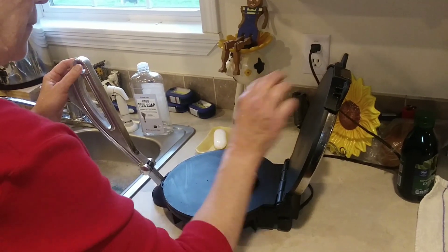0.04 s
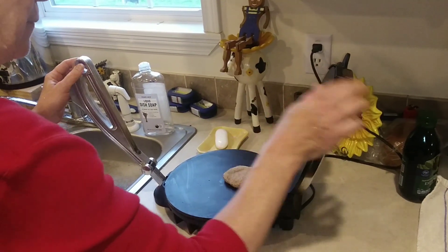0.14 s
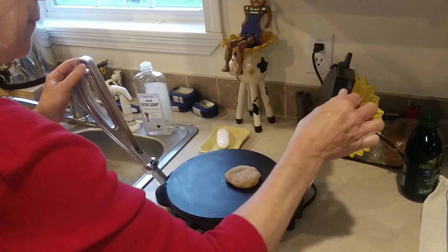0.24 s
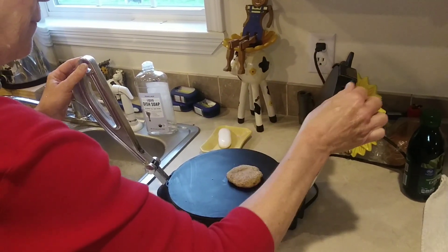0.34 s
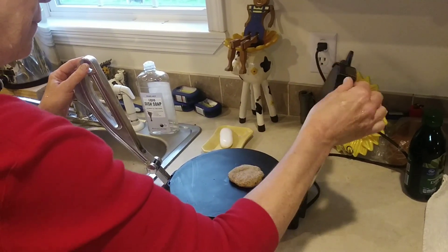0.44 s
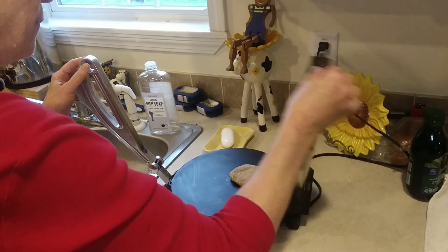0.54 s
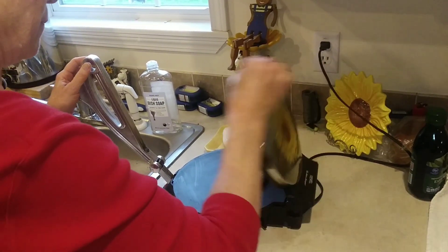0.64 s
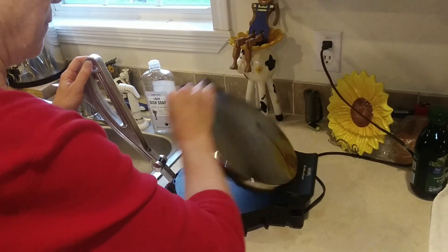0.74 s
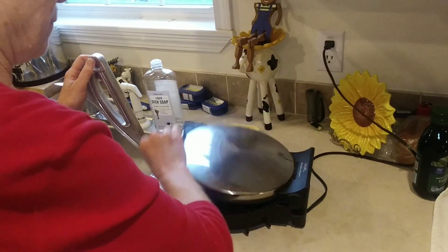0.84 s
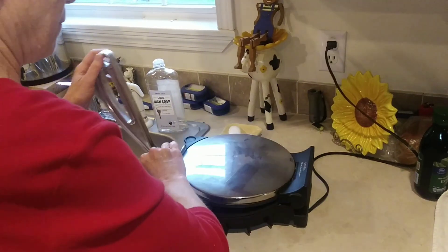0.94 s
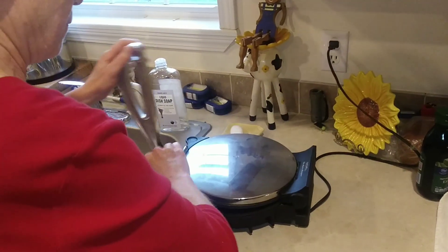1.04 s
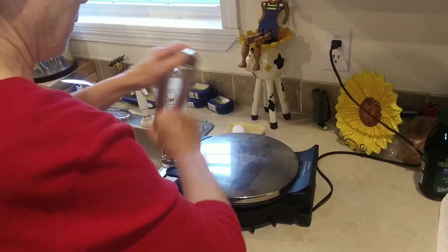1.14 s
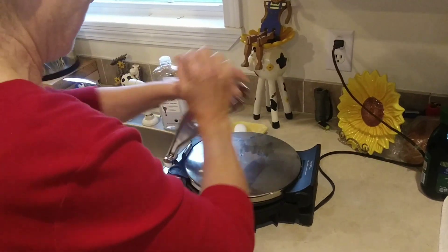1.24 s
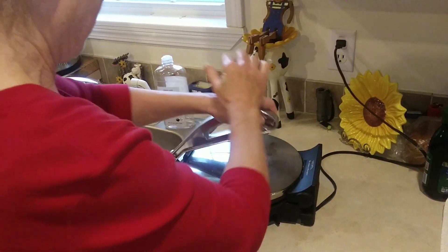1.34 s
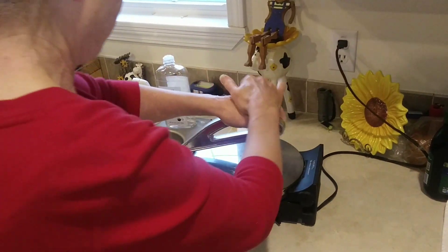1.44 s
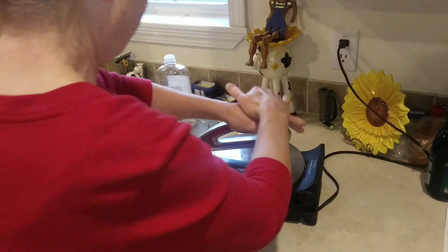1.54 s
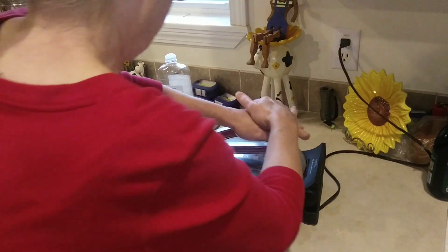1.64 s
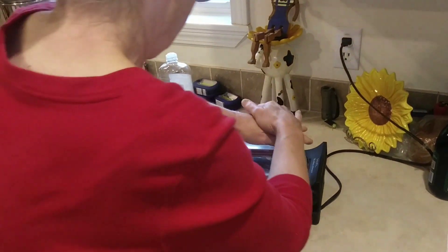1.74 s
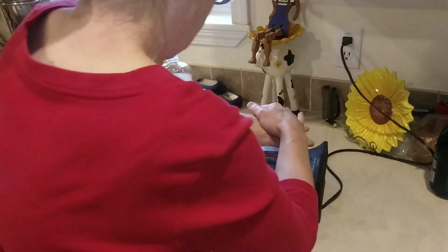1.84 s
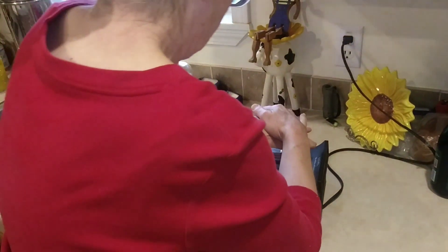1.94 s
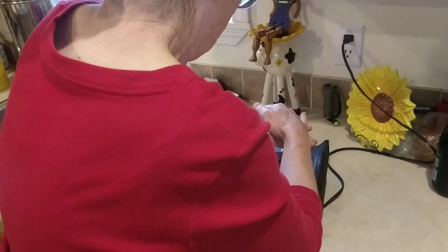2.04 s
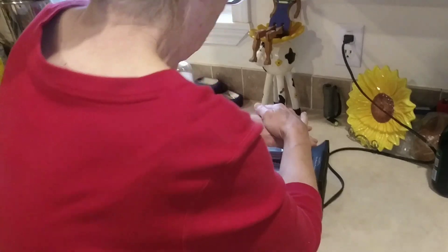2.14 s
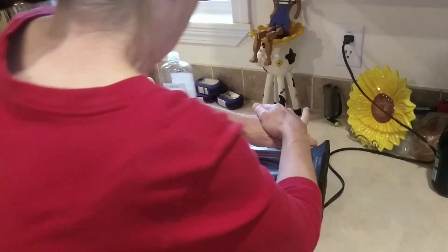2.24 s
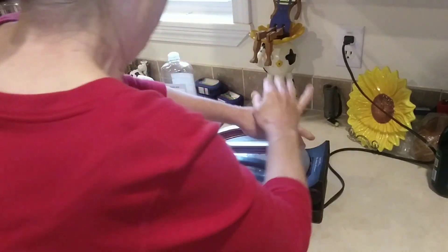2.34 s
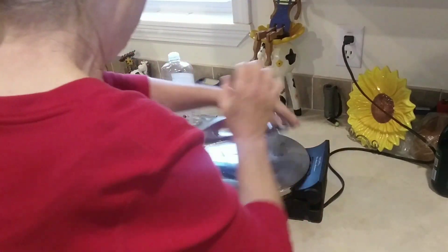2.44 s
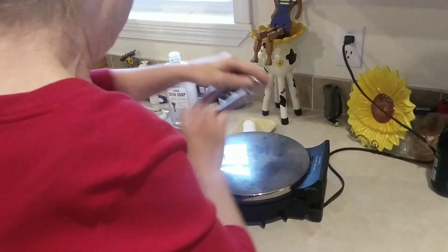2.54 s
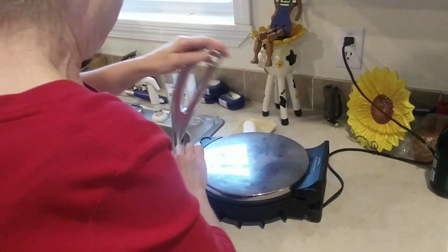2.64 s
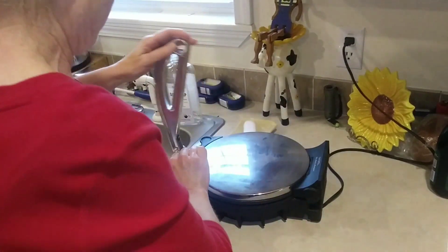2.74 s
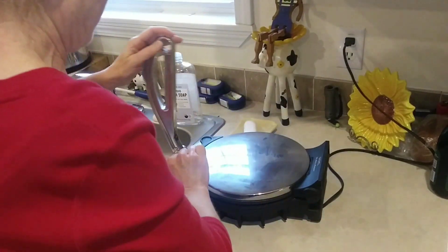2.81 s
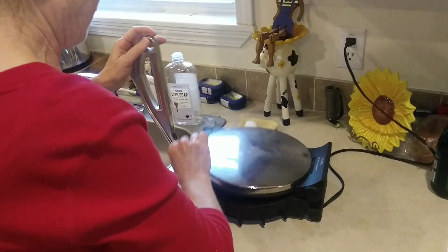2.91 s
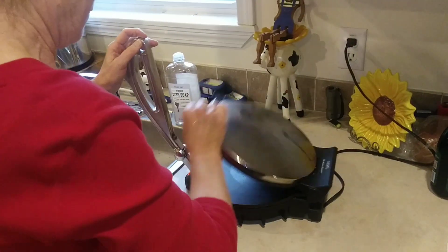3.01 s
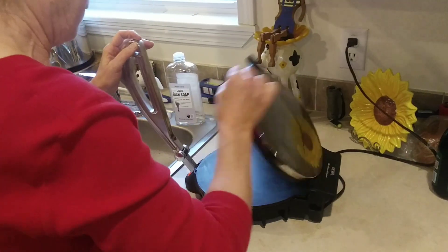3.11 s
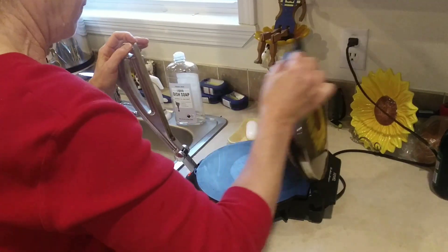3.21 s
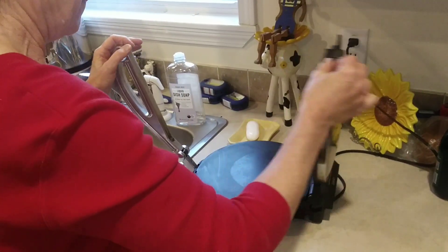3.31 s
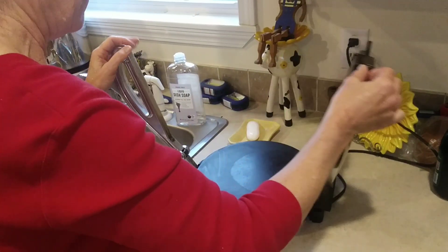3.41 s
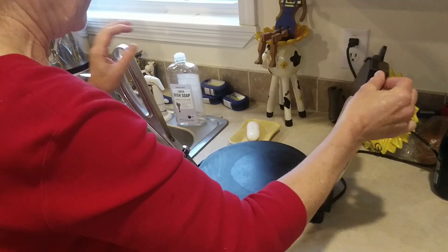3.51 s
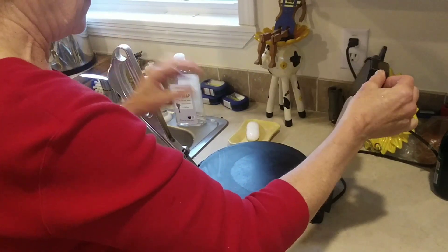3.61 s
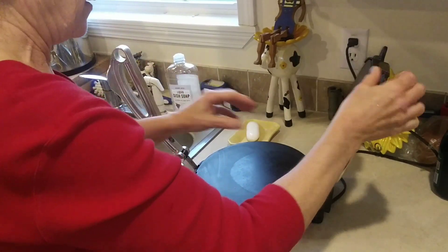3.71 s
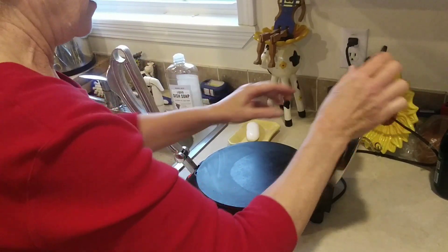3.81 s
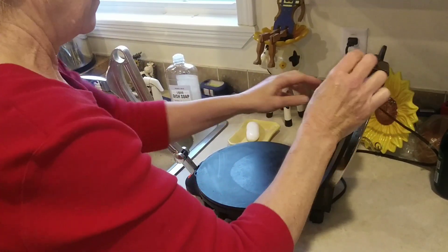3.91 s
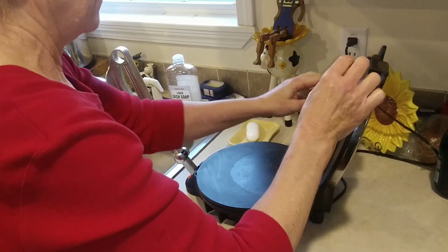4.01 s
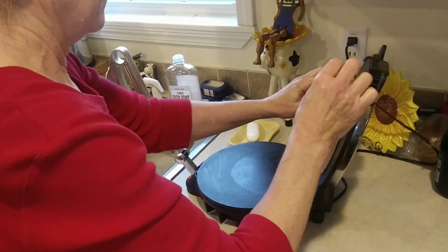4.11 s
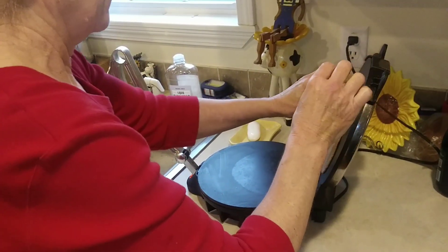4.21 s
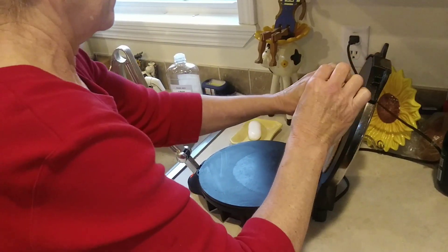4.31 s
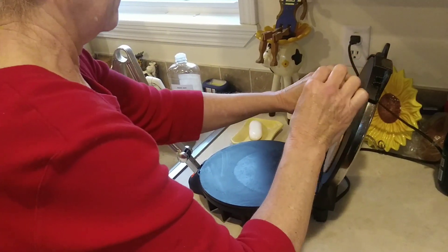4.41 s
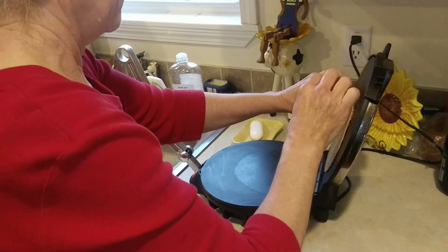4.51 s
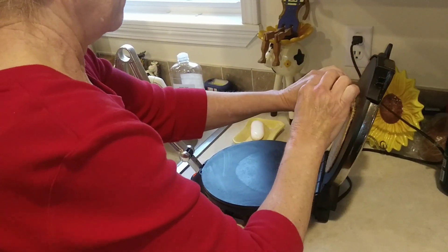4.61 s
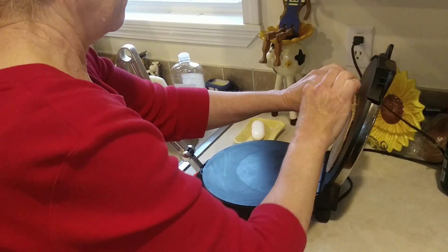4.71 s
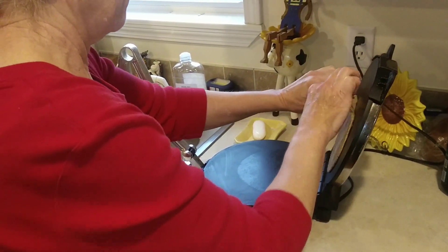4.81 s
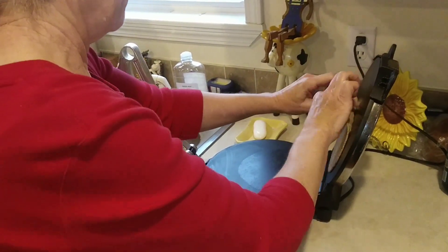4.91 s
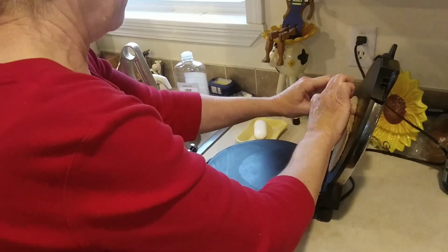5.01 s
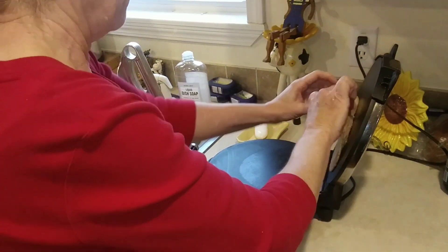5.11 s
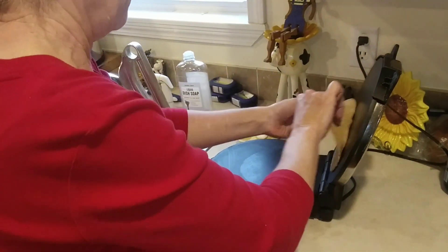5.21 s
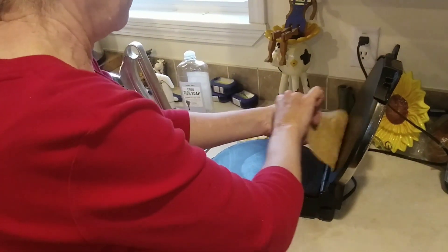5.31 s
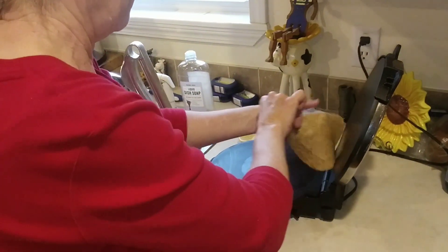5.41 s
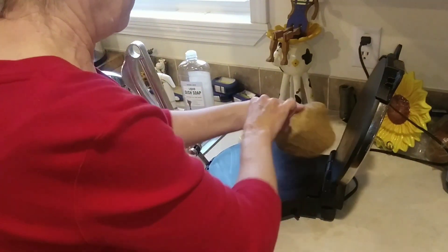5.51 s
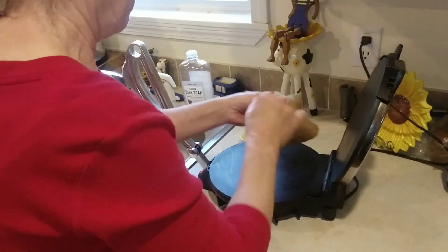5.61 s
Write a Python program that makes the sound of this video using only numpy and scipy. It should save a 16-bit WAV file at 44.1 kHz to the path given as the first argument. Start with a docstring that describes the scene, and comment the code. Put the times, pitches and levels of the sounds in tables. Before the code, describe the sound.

A near microphone with bright treble hears an electric flatbread press on a counter: one initial click, faint hand rubs, lid clattering shut, one hard lever bang with a short metal ring, a crisp snap and soft hiss. Unlatching brings scattered knocks, then the lid hits its stop. Near-quiet follows with tiny ticks and a delicate clink. Short room reflections and faint hiss remain throughout.

```python
"""Small hard kitchen, an electric tortilla press on the counter, near enough that direct sound outweighs the room.
The lid comes down on dough, the lever is swung over and leaned on, both are lifted, the tortilla is peeled off.
Dull knocks are noise bursts that ring the plates' modes; hinge and handle snap in sharp clicks; bumps, clear metal
notes and rattles surround them. Squeezed dough hisses and hands rub as grainy coloured noise.
The microphone has a bright port resonance and a faint floor of room tone and hiss."""
import sys
import numpy as np
from scipy import signal
from scipy.fft import rfft, irfft
from scipy.io import wavfile

SR = 44100
rng = np.random.default_rng(int(sys.argv[2]) if len(sys.argv) > 2 else 0)


def inscribe(sig):
    """Save sig as 16-bit PCM at rate SR to the path in sys.argv[1].

    A 1-D sig is mono; a 2-D sig holds one channel per row.
    Samples are clipped to [-1, 1] before scaling.
    """
    pcm = np.round(np.clip(np.atleast_2d(sig).T, -1, 1) * 32767)
    wavfile.write(sys.argv[1], SR, pcm.astype(np.int16))


N = 249279
BLOW_S, LONG_S = 0.015, 0.7   # span that sets a blow's level, longest ringing
CUTOFF_HZ = 15500   # top of the microphone's range


def from_db(db):
    """Decibels to gain."""
    return 10 ** (np.asarray(db) / 20)


def rms_one(x):
    """Scale to rms 1."""
    return x / np.sqrt(np.mean(x ** 2) + 1e-20)


def at_hz(points, hz):
    """Read a table on a log-frequency axis."""
    table_hz, value = np.transpose(points)
    return np.interp(np.log(np.maximum(hz, 1)), np.log(table_hz), value)


def add(out, start_s, sound):
    """Mix a sound in at a time."""
    start = max(int(start_s * SR), 0)
    out[start:start + len(sound)] += sound[:N - start]


def band(x, low_hz, high_hz, order=3):
    """Butterworth band-pass."""
    edges_hz = [low_hz, min(high_hz, 0.45 * SR)]
    return signal.sosfilt(signal.butter(order, edges_hz, "band", fs=SR, output="sos"), x)


def resonance(x, hz, width_hz):
    """One two-pole resonance with gain 1 on top."""
    radius = np.exp(-np.pi * width_hz / SR)
    numerator = np.array([1, 0, -1]) * (1 - radius ** 2) / 2
    denominator = [1, -2 * radius * np.cos(2 * np.pi * hz / SR), radius ** 2]
    return signal.lfilter(numerator, denominator, x)


def coloured(x, spectrum):
    """Filter a steady noise by a spectrum table; rms 1."""
    gain = from_db(at_hz(spectrum, np.fft.rfftfreq(N, 1 / SR)))
    return rms_one(irfft(rfft(x) * gain, N))


def swell(start_s, length_s, attack_s, fall_db_per_s):
    """Gain of one gesture: it rises, holds to the end of its length and dies away."""
    t = np.arange(N) / SR - start_s
    fall_db = fall_db_per_s * np.maximum(t - length_s, 0)
    return np.clip(t / attack_s, 0, 1) * from_db(-fall_db)


def grainy_noise(per_s, size_db, smooth_db):
    """Random little pops of uneven size on a smooth hiss."""
    happens = rng.random(N) < per_s / SR
    size = from_db(size_db * np.minimum(rng.exponential(1, N), 4))
    pops = happens * rng.choice([-1, 1], N) * size
    return rms_one(pops) + from_db(smooth_db) * rng.standard_normal(N)


def since_blow():
    """Time axis of one blow and its ringing."""
    return np.arange(int(LONG_S * SR)) / SR


def unit_blow(x):
    """Scale a blow to the energy of rms 1 lasting BLOW_S."""
    return x / np.sqrt(np.sum(x ** 2) / (BLOW_S * SR) + 1e-20)


def scatter(hold_s, t60):
    """A contact chatters and bounces off counter and wall: a dense cluster that holds briefly and dies."""
    t = since_blow()[:SR // 4]
    envelope = from_db(-60 * np.maximum(t - hold_s, 0) / t60) + 1e-12
    return rng.standard_normal(len(t)) * envelope


def contact(zones, levels_db, hold_s, t60, bass_lingers):
    """The dry crack of one blow: noise in zones, the low ones holding longer and dying more slowly."""
    crack = 0
    top_hz = zones[-1][1]
    for (low_hz, high_hz), level_db in zip(zones, levels_db):
        slower = (top_hz / high_hz) ** bass_lingers
        cluster = scatter(hold_s * slower, t60 * slower)
        crack = crack + from_db(level_db) * unit_blow(band(cluster, low_hz, high_hz, order=4))
    return crack


def struck_part(hz, width_hz, t60):
    """The part that is hit rings briefly at its own pitch: a burst through two equal resonances."""
    once = resonance(scatter(0, t60), hz, width_hz)
    return unit_blow(resonance(once, hz, width_hz))


# Knocks of lid, lever and base; weight brings thud, hardness brings tick; levels are before the trims:
# start_s, level_db, weight_db, hardness_db, pitch_hz, ring_db
KNOCKS = [(.477, -34.5, -35, -38, 1133, -37.5), (.528, -38.5, -23.5, -31, 1400, -46),
          (.569, -41.5, -10, -27, 1294, -41.5), (.7327, -46.5, -14.5, 1.5, 1490, -47),
          (0.842, -44.5, -7.5, -37, 902, -42.5), (1.0165, -27, -14.5, -25, 1182, -27),
          (1.031, -35.5, -10, -20, 550, -35), (1.047, -27, -17.5, -10.5, 545.6, -25),
          (1.1122, -30.5, -1.5, -17, 567, -28.5), (1.147, -45, -6, -16, 514, -34.5),
          (1.165, -45.5, 2, -17, 1120, -47), (1.421, -15.5, -14.5, -5.5, 610, -16.5),
          (2.019, -36.5, -5, -11.5, 409, -28.5), (2.63, -39.5, -9, -10, 1220, -43),
          (2.656, -54, -7, -13, 1900, -49), (2.918, -50, -28, -4, 1590, -46),
          (2.925, -39.5, -29, -0.5, 1794, -40), (2.9601, -31, -14, -6.5, 1750, -41),
          (2.98, -35.5, -17, -16, 360, -29.5), (2.998, -44, 3, -21, 227.4, -32.5),
          (3.046, -44, -5.5, -18.5, 1444, -42.5), (3.1676, -40.5, -3, -31, 208.5, -35.5),
          (3.354, -55.5, 4, -11, 178, -52), (3.374, -51.5, -10, -8, 207, -49),
          (3.3989, -43, -4.5, -13.5, 1060, -54), (3.542, -45, -5.5, -29, 1090, -47),
          (3.552, -44, -8, -23.5, 620, -47.5), (3.569, -31.5, -17.5, -14.5, 1533, -25.5),
          (3.596, -48, -4, 1, 198, -39), (3.6891, -41.5, -23.5, -1.5, 2390, -43)]
# Where thud, body, clack, edge and tick lie: low_hz, high_hz
KNOCK_ZONES = [(85, 250), (270, 800), (800, 2000), (2100, 4000), (6200, 13500)]
# How those five zones follow a blow: offset_db, weight_share (ratio), hardness_share (ratio)
KNOCK_RESPONSE = [(-1, 0.94, 0.19), (0.5, 0.51, 0.011), (0, 0.049, 0.029), (-4.5, 0.083, 0.56),
                  (-0.5, 0.1, 1)]


def knocks(plate_db=-6, ring_db=-3.5, crack_db=-1):
    """Heavy parts meet: a crack, the ring of the struck part, and the plates."""
    out = np.zeros(N)
    for start_s, level_db, weight_db, hardness_db, pitch_hz, part_db in KNOCKS:
        levels_db = level_db + np.array(KNOCK_RESPONSE) @ [1, weight_db, hardness_db]
        crack = contact(KNOCK_ZONES, levels_db, hold_s=0.005, t60=0.04, bass_lingers=0.22)
        ring = struck_part(pitch_hz, width_hz=83, t60=0.023)
        add(out, start_s, from_db(crack_db) * crack)
        add(out, start_s, from_db(part_db + ring_db) * ring)
        add(out, start_s, from_db(plate_db) * plates(KNOCK_ZONES, levels_db))
    return out


# Modes of the plates and lever, levels relative: pitch_hz, level_db
PRESS_MODES = [(151, 0), (200, 0.5), (551, -2), (630, -4.5), (921, -10), (1050, -11.5), (1160, -7.5),
               (1297, -16), (1393, -8), (1529, -13.5), (1577, -6.5), (1761, -8.5), (1914, -11.5),
               (2035, -14.5), (2256, -18.5), (2475, -15.5), (2600, -7.5), (2945, -10), (3359, -15)]


def plates(zones, levels_db, t60=0.25, spread_db=3):
    """Every blow rings the press as dying sines, each about as hard as the blow is at that pitch."""
    t = since_blow()
    hz, mode_db = np.transpose(PRESS_MODES)
    zone_centres_hz = np.sqrt(np.prod(zones, axis=1))
    drive_db = at_hz(np.column_stack([zone_centres_hz, levels_db]), hz)
    favour_db = rng.normal(0, spread_db, len(hz))   # each blow favours other modes
    gain = from_db(mode_db + drive_db + favour_db)
    gain = gain * (hz > zones[0][0])   # modes below the blow's lowest zone stay silent
    gain = gain * rng.choice([-1, 1], len(hz))
    return gain @ np.sin(2 * np.pi * np.outer(hz, t)) * from_db(-60 * t / t60)


# Sharp clicks of hinge, handle and hot metal, body against the snap; levels are before the trims:
# start_s, level_db, body_db, pitch_hz, ring_db
CLICKS = [(0.027, -27, -12.5, 7910, -32.5), (0.4772, -72, 16, 2780, -39), (1.587, -50, -2, 9300, -71),
          (1.67, -26.5, -2.5, 8250, -20.5), (2.370, -53, -7, 13200, -50), (2.4, -49.5, -0.5, 9740, -52),
          (2.469, -62, 0, 11760, -57), (2.727, -58.5, -10, 9000, -72), (2.785, -59, 1.5, 7500, -63.5),
          (2.8631, -45.5, -6, 9800, -44.5), (3.4454, -63.5, -18, 7210, -68),
          (3.5692, -49.5, 13.5, 2780, -31), (3.741, -73, -4, 12180, -62.5),
          (4.7805, -57.5, -4, 7496, -48.5), (5.118, -37, -11.5, 13140, -34)]
# Where clack, edge and snap lie: low_hz, high_hz
CLICK_ZONES = [(600, 2500), (2200, 5000), (6500, 14500)]
# How much clack, edge and snap follow the body: body_share (ratio)
CLICK_BODY_SHARE = [0.93, 1, 0]


def clicks(plate_db=-11, ring_db=-3, crack_db=-1):
    """Small stiff parts snap: a crack, a broad high ring, and the plates."""
    out = np.zeros(N)
    for start_s, level_db, body_db, pitch_hz, part_db in CLICKS:
        levels_db = level_db + body_db * np.array(CLICK_BODY_SHARE)
        crack = contact(CLICK_ZONES, levels_db, hold_s=0.0037, t60=0.05, bass_lingers=0.21)
        ring = struck_part(pitch_hz, width_hz=910, t60=0.055)
        add(out, start_s, from_db(crack_db) * crack)
        add(out, start_s, from_db(part_db + ring_db) * ring)
        add(out, start_s, from_db(plate_db) * plates(CLICK_ZONES, levels_db))
    return out


# Tiny dry ticks: start_s, peak_db
TICKS = [(2.2195, -45), (2.3885, -32), (2.516, -44.5), (4.064, -50.5), (4.090, -40)]


def ticks(hz=10500, width_hz=2500):
    """Single impulses through a broad high resonance, over within about a millisecond."""
    out = np.zeros(N)
    snap = resonance(signal.unit_impulse(SR // 100), hz, width_hz)
    snap = resonance(snap, hz, width_hz)
    snap = snap / np.abs(snap).max()
    for start_s, peak_db in TICKS:
        add(out, start_s, from_db(peak_db) * snap)
    return out


# Soft low bumps of hands and base: start_s, level_db, pitch_hz
BUMPS = [(0.028, -44, 471), (.59, -53, 170), (1.815, -52.5, 350), (2.305, -69, 262), (2.461, -51.5, 206),
         (3.197, -55, 210), (3.734, -57.5, 198.2), (5.618, -66, 260)]


def bumps():
    """Soft contacts carry only lows: short noise bursts through a wide low resonance."""
    out = np.zeros(N)
    for start_s, level_db, pitch_hz in BUMPS:
        add(out, start_s, from_db(level_db) * struck_part(pitch_hz, width_hz=310, t60=0.12))
    return out


def mode(hz, level_db, t60):
    """One dying sine."""
    t = since_blow()
    return from_db(level_db - 60 * t / t60) * np.sin(2 * np.pi * hz * t)


# Metal hums on after the lever lands, snaps under load and the lid hits its open stop:
# start_s, pitch_hz, level_db, t60_s
HUMS = [(1.421, 1742, -32, 0.42), (1.669, 2630, -38, .22), (3.568, 1508, -51, 0.52), (3.57, 4150, -46, .2)]
# A light metal clink as the tortilla comes off: pitch_hz, level_db
CLINK_MODES = [(980, -54), (1370, -55), (1720, -50), (2600, -37.5), (3780, -46.5), (7655, -64),
               (8263, -48.5), (8753, -52.5), (10450, -37), (12410, -36.5), (12930, -54)]
# How long the clink rings: pitch_hz, t60_s
CLINK_T60 = [(1000, 0.11), (2600, 0.05), (3800, 0.11), (13000, 0.078)]
CLINK_S = 5.118


def metal_notes():
    """Lever, lid and clink ring in clear notes, each a dying sine."""
    out = np.zeros(N)
    for start_s, pitch_hz, level_db, t60 in HUMS:
        add(out, start_s, mode(pitch_hz, level_db, t60))
    for pitch_hz, level_db in CLINK_MODES:
        add(out, CLINK_S, mode(pitch_hz, level_db, at_hz(CLINK_T60, pitch_hz)))
    return out


# Loose hinge and plates rattle as the lid settles, the lever lands and the lid is lifted:
# start_s, length_s, level_db
RATTLES = [(1.002, 0.078, -43), (1.425, 0.034, -30.5), (2.955, 0.0094, -37)]
# Colour of the rattle: pitch_hz, level_db (per Hz)
RATTLE_COLOUR = [(100, -12.5), (350, 4), (800, -2.5), (1700, 1), (3500, -12), (6000, -17.5), (9000, -17.5),
                 (15000, -26)]


def rattling():
    """Loose parts chatter in quick uneven taps, heard while each shake swells and falls."""
    taps = grainy_noise(per_s=320, size_db=0.5, smooth_db=-9)
    shaking = np.zeros(N)
    for start_s, length_s, level_db in RATTLES:
        shaking += from_db(level_db) * swell(start_s, length_s, attack_s=0.014, fall_db_per_s=218)
    return shaking * coloured(taps, RATTLE_COLOUR)


# Colour of the steam: pitch_hz, level_db (per Hz)
STEAM_COLOUR = [(200, 1.5), (1200, -4), (3000, -2.5), (6000, -12), (9000, -4), (15000, -7)]
FULL_PRESSURE_S, LID_LIFT_S, PEEL_S = 1.7, 3, 5.31
SIZZLE_DB, STEAM_DB, PEEL_DB = -76.5, -62.5, -70   # open plate, full pressure, last puff
BUILD_DB_PER_S, DRY_DB_PER_S, VENT_DB_PER_S = 24.5, 2.5, 23
PEEL_ATTACK_S, PEEL_FALL_DB_PER_S = 0.06, 31.5


def steam():
    """Dough moisture boils hardest at full pressure, dries a little, vents at the lid lift and puffs at the peel."""
    t = np.arange(N) / SR
    building_db = BUILD_DB_PER_S * (FULL_PRESSURE_S - t)
    drying_db = DRY_DB_PER_S * (t - FULL_PRESSURE_S)
    pressed = from_db(STEAM_DB - np.maximum(building_db, drying_db))
    venting = from_db(-VENT_DB_PER_S * np.maximum(t - LID_LIFT_S, 0))
    boiling = np.hypot(from_db(SIZZLE_DB), pressed) * venting
    # the puff is fully risen at PEEL_S
    puff = from_db(PEEL_DB) * swell(PEEL_S - PEEL_ATTACK_S, PEEL_ATTACK_S, PEEL_ATTACK_S, PEEL_FALL_DB_PER_S)
    fizz = grainy_noise(per_s=600, size_db=3, smooth_db=6)
    return (boiling + puff) * coloured(fizz, STEAM_COLOUR)


# Strokes of the hands over lever and lid: start_s, length_s, level_db
RUBS = [(0.396, 0.031, -61.5), (0.472, 0.5, -73), (.975, 0.026, -51.5), (2.289, 0.11, -53),
        (3.77, 0.27, -74)]
# Colour of the rubbing: pitch_hz, level_db (per Hz)
RUB_COLOUR = [(100, 2.5), (350, 4), (1600, 4), (3500, 2), (6000, -7), (10000, -4), (15000, -5)]


def rubbing():
    """Skin and sleeve slip over the press in fine grains."""
    grains = grainy_noise(per_s=1300, size_db=2.5, smooth_db=3)
    strokes = np.zeros(N)
    for start_s, length_s, level_db in RUBS:
        strokes += from_db(level_db) * swell(start_s, length_s, attack_s=0.039, fall_db_per_s=382)
    return strokes * coloured(grains, RUB_COLOUR)


# How long the kitchen rings: pitch_hz, t60_s
ROOM_T60 = [(120, 0.8), (400, 0.25), (1200, .36), (3000, .35), (8000, .29), (15000, 0.2)]
# How loud the kitchen answers against the direct sound: pitch_hz, level_db
ROOM_SEND = [(120, -12), (400, -12), (1200, -8), (3000, -6.5), (8000, -12.5), (15000, -13.5)]


def kitchen(x, build_s=0.0092):
    """Diffuse reflections build up and die: octave bands of noise, each with its own decay and level."""
    t, response = since_blow(), 0
    edges_hz = 60 * 2.0 ** np.arange(10)
    for low_hz, high_hz in zip(edges_hz, edges_hz[1:]):
        if low_hz < CUTOFF_HZ:
            centre_hz = np.sqrt(low_hz * high_hz)
            decay = from_db(-60 * t / at_hz(ROOM_T60, centre_hz))
            build_up = 1 - np.exp(-(t / build_s) ** 2)
            tail = band(rng.standard_normal(len(t)), low_hz, high_hz) * decay * build_up
            share = 2 * (min(high_hz, SR / 2) - low_hz) / SR   # of the whole spectrum
            unit_tail = tail * np.sqrt(share / np.sum(tail ** 2))
            response = response + from_db(at_hz(ROOM_SEND, centre_hz)) * unit_tail
    return signal.fftconvolve(x, response)[:N]


def scene():
    """The press and the room around it; the ticks reach the room 3 dB weaker."""
    press = knocks() + clicks() + bumps() + metal_notes() + rattling() + steam() + rubbing()
    tiny = ticks()
    return (press + tiny + kitchen(press + from_db(-3.0) * tiny))[None]


# Resonances of the microphone port: pitch_hz, width_hz, boost_db
PORT = [(2960, 910, 1.5), (5200, 2100, 1.5), (7720, 990, 9.5), (8550, 1700, 8.5)]
# Colour of the room tone and hiss: pitch_hz, level_db (per Hz)
FLOOR = [(30, -26), (70, -2), (140, 0.5), (280, 2.5), (600, -4), (1500, -6.5), (3000, -10), (6000, -16),
         (7300, -9.5), (8100, -5.5), (9500, -10.5), (12000, -11), (15000, -13)]
FLOOR_DB = -67.5


def record(dry):
    """The microphone port rings in the treble, a faint floor lies under all, peaks are rounded, the top is cut."""
    heard = dry
    for hz, width_hz, boost_db in PORT:
        heard = heard + (from_db(boost_db) - 1) * resonance(heard, hz, width_hz)
    heard = heard + from_db(FLOOR_DB) * coloured(rng.standard_normal(N), FLOOR)
    ceiling = 0.75
    rounded = heard / (1 + (heard / ceiling) ** 6) ** (1 / 6)
    low_pass = signal.ellip(10, 0.1, 80, CUTOFF_HZ, fs=SR, output="sos")
    return signal.sosfilt(low_pass, rounded)


dry = scene()
out = record(dry)
inscribe(out)
```